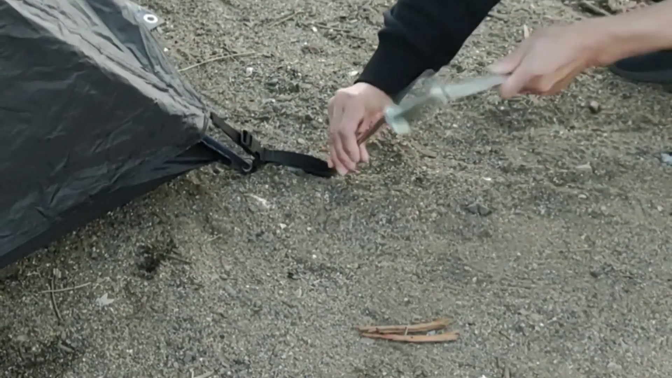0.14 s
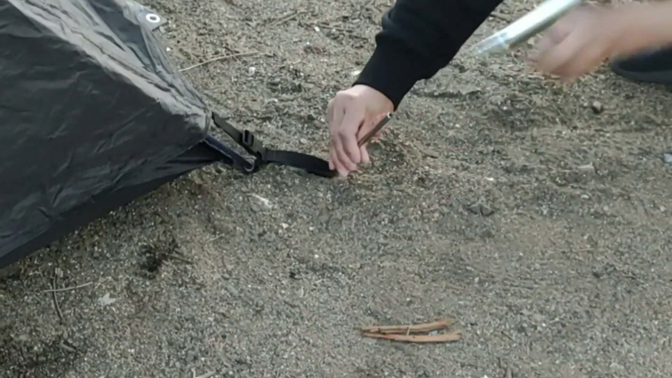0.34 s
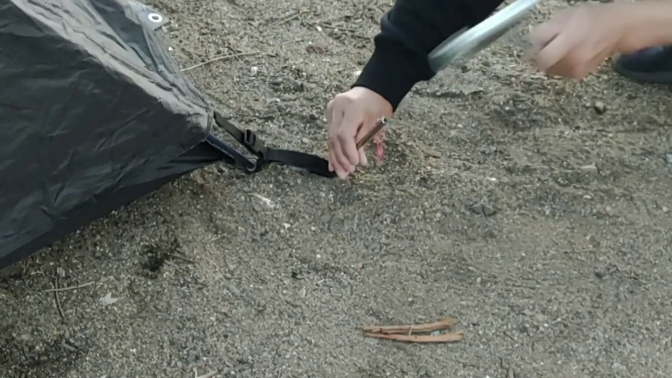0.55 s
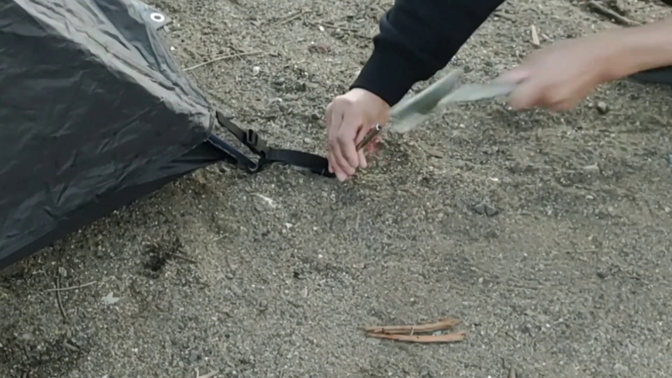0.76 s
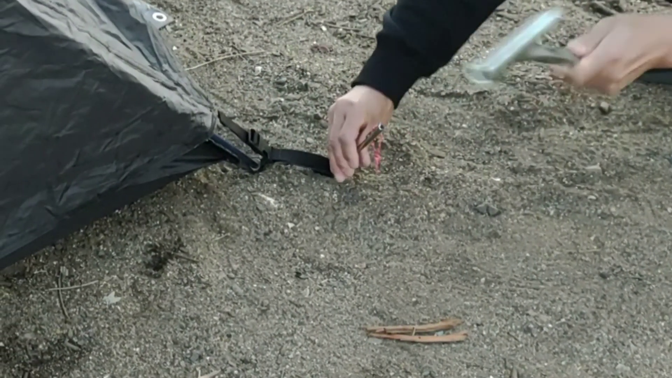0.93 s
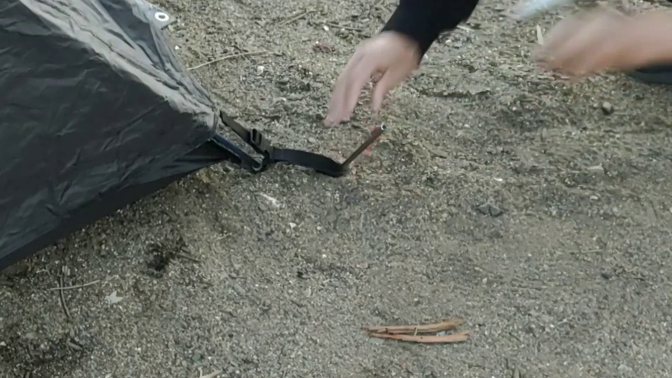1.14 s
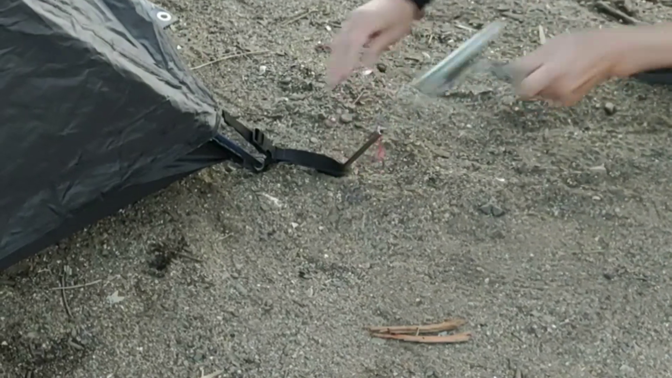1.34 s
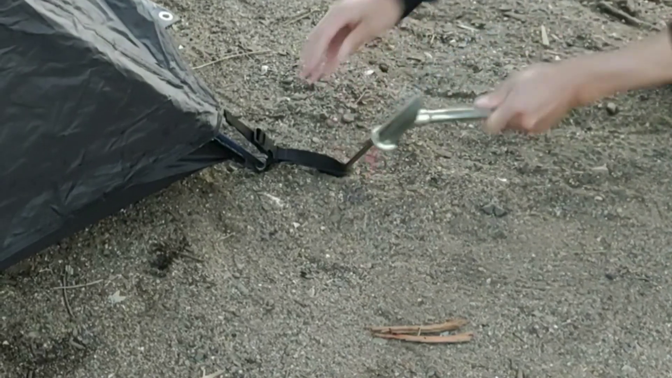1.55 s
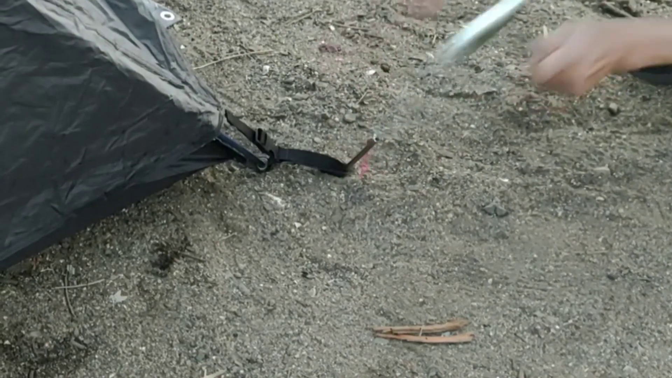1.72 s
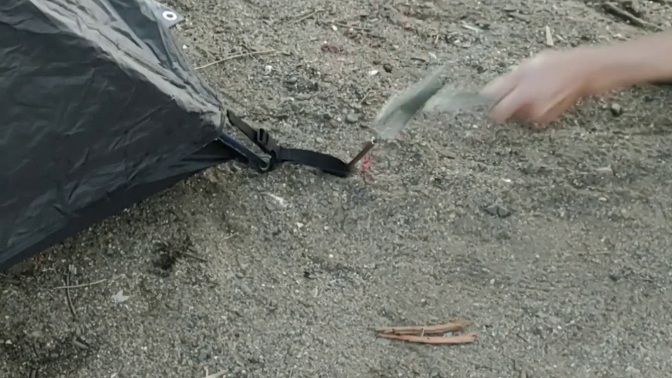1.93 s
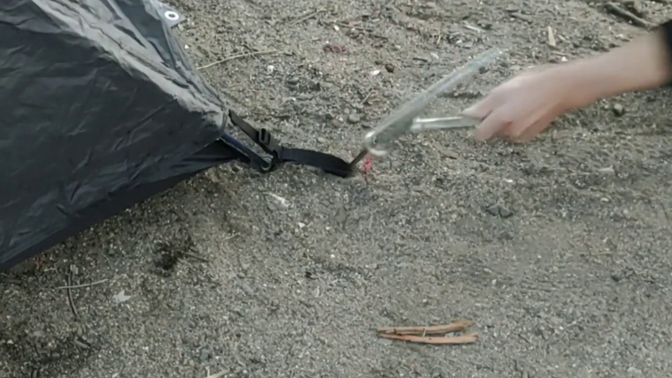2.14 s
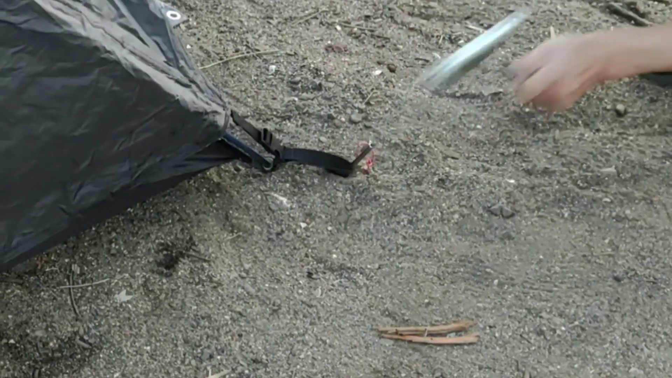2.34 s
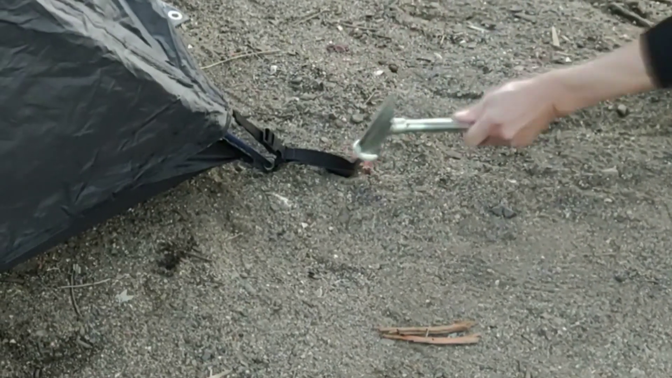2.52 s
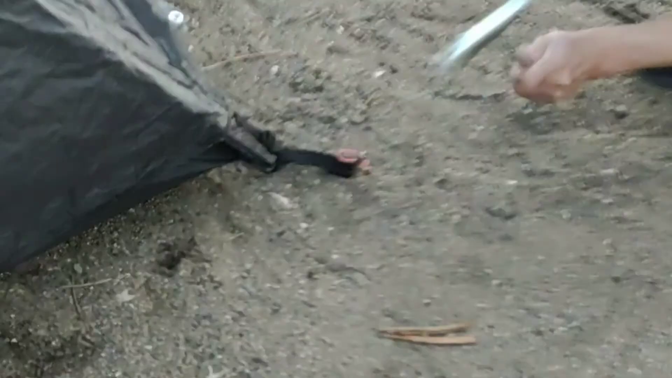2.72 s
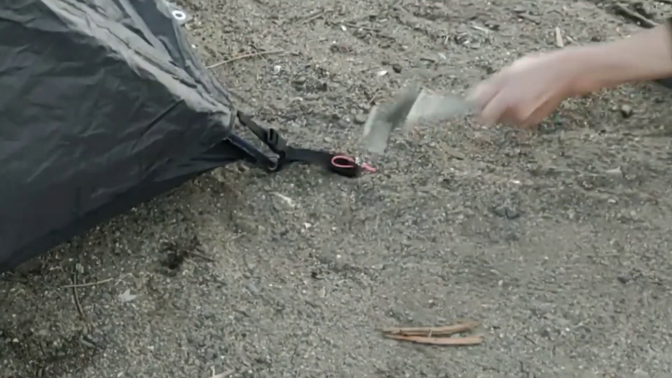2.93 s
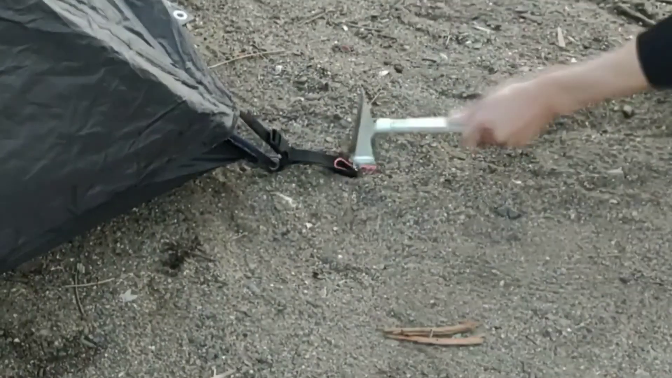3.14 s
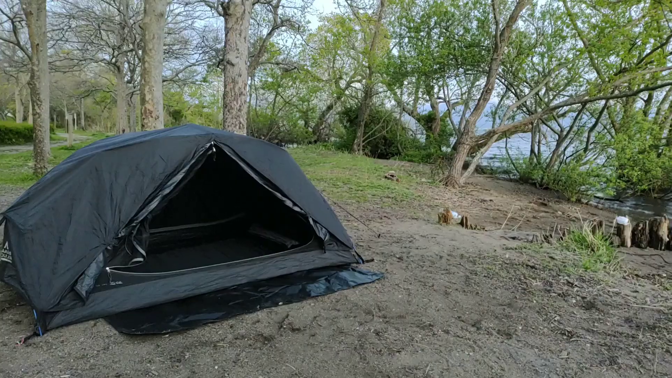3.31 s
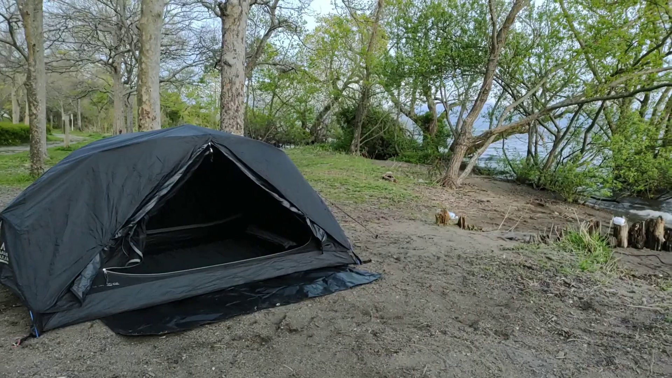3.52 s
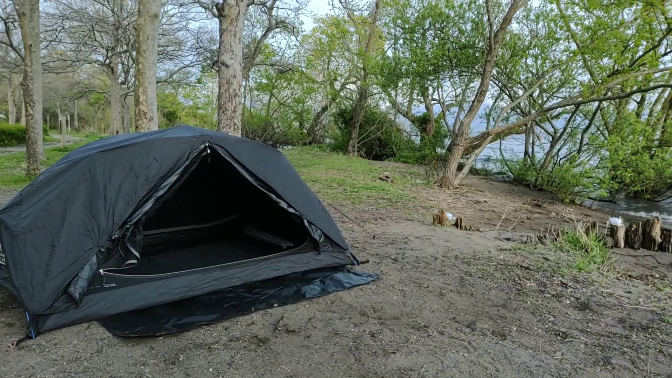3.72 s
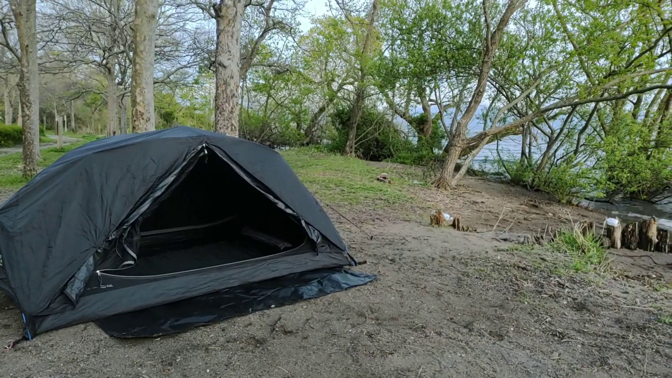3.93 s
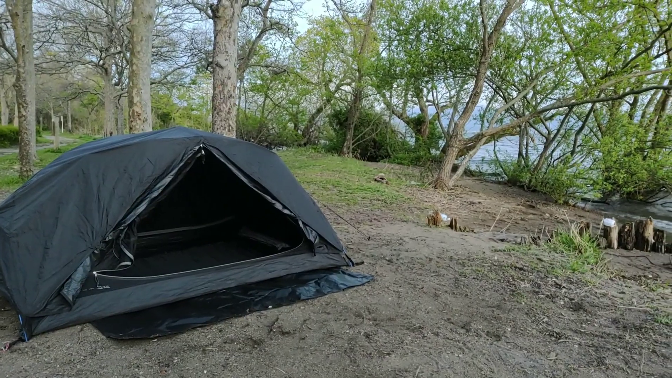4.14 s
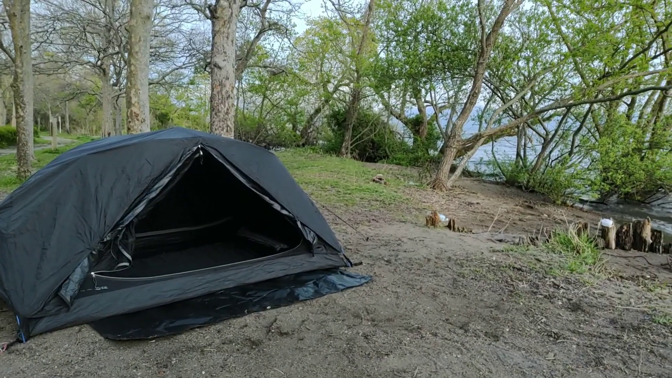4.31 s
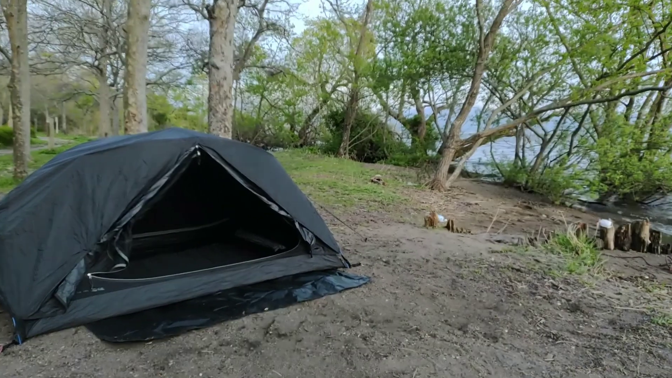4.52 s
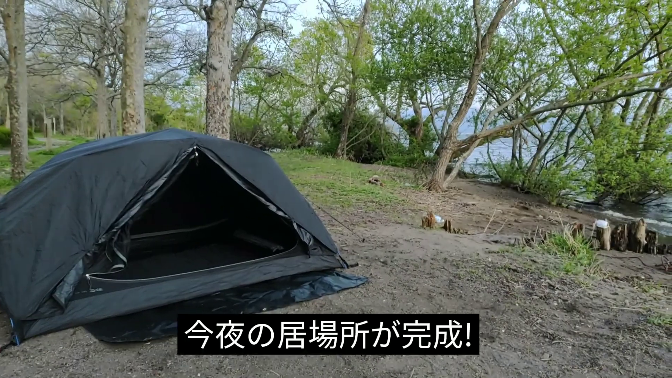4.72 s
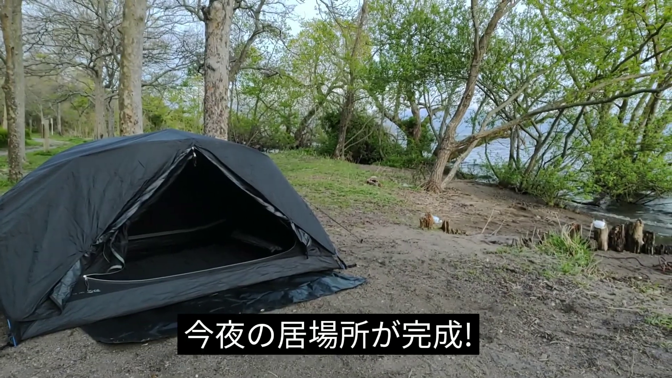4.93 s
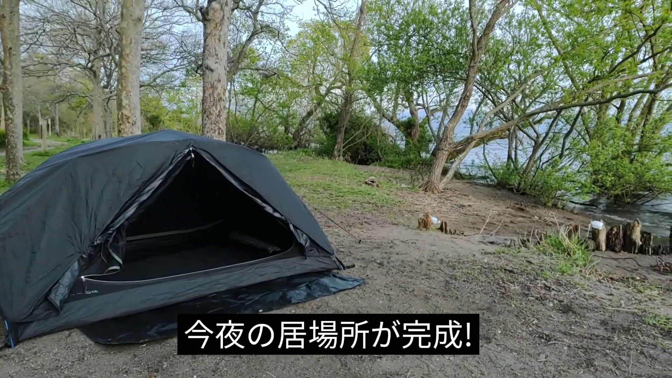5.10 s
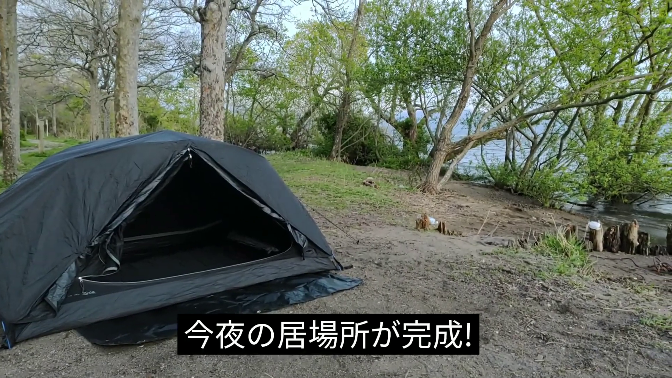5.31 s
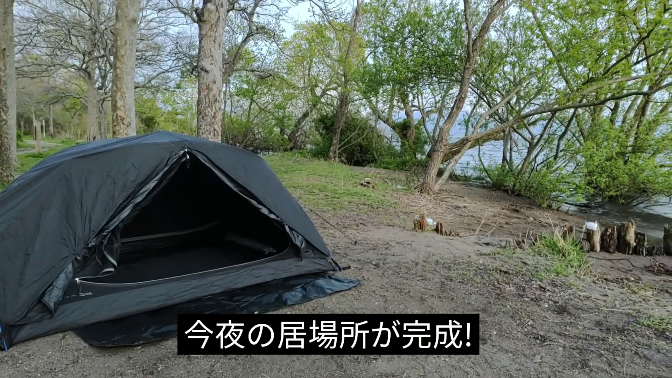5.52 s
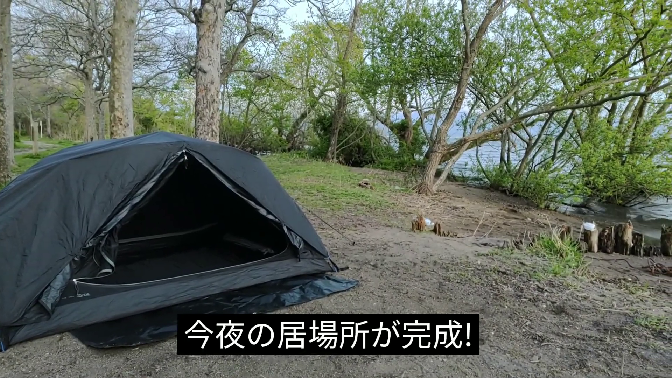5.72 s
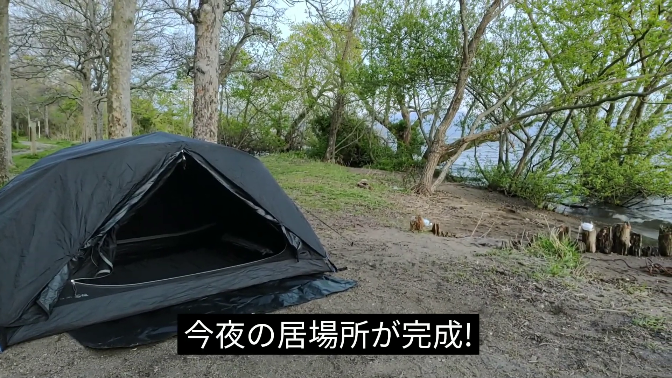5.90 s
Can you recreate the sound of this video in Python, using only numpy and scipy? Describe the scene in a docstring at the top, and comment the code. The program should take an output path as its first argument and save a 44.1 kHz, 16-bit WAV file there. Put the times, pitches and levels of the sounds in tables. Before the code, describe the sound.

The scene opens on the fading end of a hammer blow. Close by, a steel hammer then strikes a metal tent peg at about 0.27, 0.53, 0.8, 1.35, 1.65, 2.0, 2.3, 2.6 and 2.95 seconds. Each clink is hard, very bright and short, with a high ringing note, gritty crunch, dry knock and small thud into soil, then thin shimmer and faint dense echoes from trees. A soft breeze with low rumble and a faint wavering drone sits below, ducking at blows; small scuffs, low microphone thumps and a faint water lap or two near 2 seconds. At 3.2 everything cuts to a very short silence. From 3.4 a lake shore fades in: small waves wash, splash and hiss, swelling around 4.3, easing near 5, rising again at 5.6 to 6, with bubbling gulps, spray patter, crisp ticks mostly left, and deep rumble.

```python
"""Tent peg among trees, then a lake shore

Close by, a steel hammer drives a peg into gritty ground: one blow already dying away, then nine clinks
of ringing modes and noise bursts, scattered back as dense faint echoes. A limiter ducks the breeze at
loud blows. After a short silence a stirred lake shore fades in: shaped noise, ringing grains, ticks.
Water laps in both places, and each microphone port adds its own treble resonance."""
import sys
import numpy as np
from scipy import signal
from scipy.fft import rfft, irfft, next_fast_len
from scipy.io import wavfile
from scipy.ndimage import uniform_filter1d, minimum_filter1d

SR = 44100
rng = np.random.default_rng(int(sys.argv[2]) if len(sys.argv) > 2 else 0)


def pcm_store(signal):
    """Save signal as 16-bit PCM."""
    levels = np.round(np.clip(np.atleast_2d(signal), -1, 1) * 32767)
    wavfile.write(sys.argv[1], SR, levels.astype(np.int16).T)


N = 267201
TIME = np.arange(N) / SR
TENT_END_S, SHORE_START_S, SHORE_FADE_IN_S = 3.228, 3.362, 0.13
CUTOFF_HZ = 15500

# Hammer blows. Each row: start in seconds, strength in dB, the peg's note in Hz, then in dB the levels of
# note, lingering part, low clank, high clank, top ping, and knock with thud; last the jolt to the left
# and right microphone (linear).
BLOWS = [(-0.016, -18, 6880, 13, 1.5, -2, 6, -4, -4, 0.0077, 0.022),
         (0.2692, -5, 6820, 1, -8.5, 4, 14, -15, 2.5, 0.33, 0.091),
         (0.5349, -4, 6780, -3.5, -8, 7, -4, -17, 1, 0.33, 0.18),
         (0.791, -6, 6860, 2.5, 4.5, 2, -14, 3.5, 3, 0.037, 0.12),
         (1.3482, -5.5, 7040, 5, -7, 9, 0, -8, 1.5, 0.07, 0.13),
         (1.653, -5.5, 6904, 9.5, 6, 3, 0, -4, 1, 0.033, 0.48),
         (1.978, -3.5, 6900, -5.5, -6, 3, 0.5, -10, 1, 0.017, 0.0023),
         (2.2892, -5.5, 6800, 2, -1.5, 9.5, 5, -0.5, 3, 0.52, 0.1),
         (2.6268, -3.5, 6760, 1, 0, 10.5, 3.5, 8.5, 6, 0.37, 0.89),
         (2.948, -6, 6820, 1.5, 2.5, -8, 2.5, -19, 1.5, 0.072, 0.11)]
# Peg damped by soil and hand. Each row: nominal mode in Hz, level in dB, 60 dB decay in seconds.
PEG_MODES = [(4650, -30.5, 0.014), (4920, -44, 0.012), (7180, -7, 0.012), (6750, -21, 0.014),
             (7420, -12, 0.037), (7890, -8.5, 0.013), (8800, -16.5, 0.042), (9000, -12.5, 0.013),
             (9600, -48, 0.055), (9800, -24, 0.037), (11460, -28, 0.014), (12400, -39.5, .022),
             (13200, -19, 0.033), (13800, -22.5, 0.039)]
# Centres of low clank, high clank and top ping. Each row: nominal Hz, level in dB, 60 dB decay in seconds.
CLANK = [(4415, -18.5, 0.018), (5650, -16, 0.022), (11240, -14, 0.018)]
CLANK_SPLIT_HZ = 132   # nominal spacing of the three modes in a clank
# Grit crunching around the peg. Each row: frequency in Hz, density in dB per Hz.
CRUNCH_COLOUR = [(1500, -15), (3000, 2.5), (4300, 3.5), (5600, 4), (6200, -8), (7000, -2), (9000, -12.5),
                 (11000, 8.5), (12500, 3), (15000, 10)]
# Close modes that beat as the peg's note. Each row: offset from the note in Hz, level in dB.
NOTE_MODES = [(-6.5, -7.5), (35.5, -30), (-74, -20)]
NOTE_T60_S = 0.058   # how fast the soil soaks up the peg's note
# Lingering partials of the note. Each row: offset from the note in Hz, spread in Hz, level in dB.
LINGER = [(0.5, 13, -24.5), (-60.5, 59, -30)]
# Fine partials of hammer head and peg. Each row: centre in Hz, spread in Hz, level in dB.
SHIMMER = [(5600, 54, -44.5), (7350, 70, -43.5), (7900, 95, -36.5), (11200, 110, -34.5), (12150, 80, -42.5),
           (13660, 170, -41.5), (14650, 250, -38), (15250, 130, -40)]
# Scatter from ground, tent and trees. Each row: delay in seconds, 60 dB decay in seconds, level in dB.
SCATTER = [(.002, 0.032, -7.5), (0.011, 0.416, -14.5)]
# Colour of the scattered sound. Each row: frequency in Hz, level in dB.
SCATTER_COLOUR = [(1500, -35.5), (3600, 0), (4400, -0.5), (5800, -2), (6300, -20.5), (6800, 6.5),
                  (7300, -1), (10000, -0.5), (10600, -14.5), (11200, -5), (12700, -5.5), (15500, -6.5)]
# Soft scuffs on the grit beside the tent. Each row: start in seconds, relative level in dB, length in seconds.
SCUFFS = [(0.078, -39, 0.0096), (2.44, -57, 0.035), (3.078, -37, 0.058)]

# Small waves breaking on the shore. Each row: crest in seconds, height in dB above the calm water.
WAVES = [(3.52, -1.5), (3.8, 5), (4.3, 8.5), (4.55, 5.5), (5.2, 3), (5.45, 3), (5.63, 6.5), (5.82, 9),
         (6.02, 5.5)]
WAVE_RISE_S, WAVE_FALL_S = 0.089, 0.14   # time constants of build-up and run-out
# The water's three voices. Each row: frequency in Hz, density in dB per Hz.
WASH_COLOUR = [(20, 1), (60, -1.5), (150, -2.5), (400, -1), (750, -1), (1100, -4), (2000, -18), (5000, -46)]
SPLASH_COLOUR = [(500, -36), (1200, 2), (2000, -0.5), (2800, 0), (3500, -3), (4500, -2.5), (6000, -9),
                 (9000, -9.5), (15000, -18.5)]
HISS_COLOUR = [(500, -18), (3000, 1.5), (5500, 4), (8000, 4), (10000, 3), (11500, -4), (15500, -2)]
# level when calm (dB), and dB gained per dB of swell
WASH_DB, WASH_FOLLOWS = -49.5, 0.44
SPLASH_DB, SPLASH_FOLLOWS = -52.5, 0.92
HISS_DB, HISS_FOLLOWS = -56.5, 0.88
# Left-right likeness at the shore. Each row: frequency in Hz, likeness from -1 (opposed) to 1 (same).
SHORE_LIKENESS = [(30, 0.79), (120, 1), (300, 1), (700, 0.58), (1500, 0.65), (3000, 0.3), (8000, 0.093)]
SHORE_LAG_S = 0.000414   # the water's sound reaches the left microphone first
# Water lapping at the bank. Each row: start in seconds, nominal pitch in Hz, relative level in dB.
LAPS = [(1.874, 278, -32), (2.068, 740, -38), (3.502, 790, -33), (4.056, 690, -36), (4.36, 266, -35),
        (4.708, 433, -37), (5.28, 380, -34), (5.282, 495, -34), (5.6, 245, -29), (5.718, 470, -28),
        (5.793, 320, -29), (5.803, 405, -28), (5.865, 340, -32), (5.93, 420, -34)]
# Light ticks of twigs and grit. Each row: start in seconds, relative level in dB.
TICKS = [(3.6538, -27.5), (3.784, -21), (4.2235, -27), (4.2675, -17.5), (4.285, -25), (4.379, -22),
         (4.5298, -27), (5.145, -25), (5.1692, -16.5), (5.4397, -28), (5.4631, -27), (5.6906, -27),
         (5.752, -25), (5.829, -23)]

# Low rumble under the shore. Each row: time in seconds, level in dB.
LOW_RUMBLE = [(3.36, -63), (3.5, -63.5), (3.55, -48), (3.8, -44), (4.2, -43.5), (4.45, -45.5), (4.7, -51.5),
              (5.1, -52.5), (5.3, -52.5), (6.05, -55)]
# Its colour. Each row: frequency in Hz, density in dB per Hz.
LOW_RUMBLE_COLOUR = [(8, 11.5), (20, 0), (35, -5.5), (70, -2.5), (130, -10.5), (400, -23.5), (2000, -76)]
# Level of the breeze at the tent, at first still ducked by the limiter after the earlier blow.
# Each row: time in seconds, level in dB.
BREEZE = [(0, -6.5), (.065, -9.5), (.085, 0.5), (.6, -.5), (1.2, 1.5), (2.15, 2.5), (2.5, 3), (2.85, 1),
          (3.22, 1.5)]
# Soft air and low rumble of the breeze. Each row: frequency in Hz, density in dB per Hz.
AIR_COLOUR = [(60, -11.5), (200, -1), (500, -1.5), (1000, -1), (1500, -3.5), (2500, -4.5), (4000, -11),
              (6000, -9.5), (8000, -11.5), (10000, -13.5), (12000, -21), (15500, -26.5)]
RUMBLE_COLOUR = [(10, 4), (25, 1.5), (60, -1.5), (92, -2), (120, -7), (190, -15.5), (300, -20.5),
                 (700, -25), (3000, -85)]
AIR_DB, RUMBLE_DB, RUMBLE_FOLLOWS = -50, -41.5, 2.05   # levels at 0 dB of breeze; dB of rumble per dB of breeze
# Left-right likeness at the tent. Each row: frequency in Hz, likeness from -1 (opposed) to 1 (same).
TENT_LIKENESS = [(30, -0.019), (120, 0.2), (300, 0.81), (700, 0.21), (1300, -0.54), (2500, 0.013),
                 (15000, -0.17)]
# Low thumps in the microphones, some as the limiter lets go.
# Each row: start in seconds, relative left and right level in dB.
THUMPS = [(.078, 2.5, -24), (2.713, -5, 2.5), (2.92, -9.5, 0), (3.208, -13, -3)]
# A faint low drone. Each row: time in seconds, level in dB.
DRONE = [(0, -57), (.8, -49.5), (1.2, -45), (1.9, -44.5), (2.5, -41), (3.2, -61)]
# Microphone ports, left then right. Each row: resonance in Hz, half its Q, lift in dB.
PORTS = [(7920, 5.43, 15.5), (9540, 6, 16)]


def from_db(db):
    """Decibels to gain."""
    return 10 ** (np.asarray(db) / 20)


def in_time(rows):
    """Each column of a curve, at every sample."""
    s, *columns = np.transpose(rows)
    return [np.interp(TIME, s, column) for column in columns]


def at_hz(points, hz):
    """Read a spectrum on a log-frequency axis."""
    f, value = np.transpose(points)
    return np.interp(np.log(hz + 1), np.log(f), value)


def dying(t, t60):
    """Exponential decay, 60 dB down after t60 seconds."""
    return np.exp(-np.log(1000) * t / t60)


def add(out, s, sound):
    """Mix a sound in from time s; what falls outside the scene is cut off."""
    i = round(s * SR)
    out[:, max(0, i):i + sound.shape[-1]] += sound[..., max(0, -i):N - i]


def band(x, low_hz, high_hz):
    """Causal band-pass."""
    edges = [low_hz, min(high_hz, .45 * SR)]
    return signal.sosfilt(signal.butter(2, edges, "band", fs=SR, output="sos"), x)


def drift(rate):
    """Random wander around zero, through `rate` normally distributed points a second."""
    knots = rng.standard_normal(2000)
    return np.interp(TIME * rate, np.arange(len(knots)), knots)


def noise(spectrum, flutter_db, rate, likeness=TENT_LIKENESS, lag_s=0):
    """Stereo noise of a given colour, fluttering in level and late on the right by lag_s; rms 1."""
    size = next_fast_len(N, real=True)
    hz = np.arange(size // 2 + 1) * SR / size
    alike = np.clip(at_hz(likeness, hz), -1, 1)
    mid, side = rfft(rng.standard_normal((2, size)))
    pair = np.sqrt(1 + alike) * mid + np.sqrt(1 - alike) * side * [[1], [-1]]
    pair[1] *= np.exp(-2j * np.pi * hz * lag_s)
    coloured = irfft(pair * from_db(at_hz(spectrum, hz)), size)[:, :N]
    x = coloured * from_db(flutter_db * drift(rate))
    return x / x.std()


def ring(t, modes, spread_db):
    """Struck modes; each reaches either port with its own strength and phase."""
    hz, db, t60 = np.transpose(modes)[:, :, None, None]
    gain = from_db(db + spread_db * rng.standard_normal((len(modes), 2, 1)))
    phase = 2 * np.pi * rng.random((len(modes), 2, 1))
    build_up = 1 - dying(t, .001)
    return np.sum(gain * np.sin(2 * np.pi * hz * t + phase) * dying(t, t60), axis=0) * build_up


def partials(t, groups, t60, count=12):
    """Groups of close partials that beat irregularly as they die."""
    modes = [(hz + width * off, db - 10 * np.log10(count), t60)
             for hz, width, db in groups for off in rng.standard_normal(count)]
    return ring(t, modes, 0)


def grains(per_s, low_hz, high_hz, cycles, spread_db, count=16):
    """Random small pops ring at `count` pitches, each pop at its own place; 60 dB down in `cycles`; rms 1."""
    out = np.zeros((2, N))
    for hz in np.geomspace(low_hz, high_hz, count):
        when, size, place = rng.random((4000, 3))[:int(per_s * N / SR / count)].T
        pops = np.zeros((2, N))
        level = from_db(-spread_db * np.log(0.018 + size))   # a few pops are much louder
        pops[:, (when * N).astype(int)] = level * np.sqrt([place, 1 - place])
        # two-pole resonator
        r, w = dying(1 / SR, cycles / hz), 2 * np.pi * hz / SR
        feed = [0, np.sin(w), -np.sin(w)] / (2 * np.sin(w / 2))
        out += signal.lfilter(feed, [1, -2 * r * np.cos(w), r * r], pops + 1e-18)
    return out / out.std()


def hammer(crack_db=4.0, crack_t60=0.0028, crunch_db=-8.0, crunch_t60=0.022, knock_db=-7.0,
           knock_t60=0.026, thud_db=-3.0, thud_t60=0.024, detune=0.0044):
    """Steel cracks on steel, peg and head ring, grit crunches, a dry knock and a thud go into the soil."""
    out, t = np.zeros((2, N)), TIME[:SR // 4]
    grit_colour = from_db(at_hz(CRUNCH_COLOUR, np.fft.rfftfreq(len(t), 1 / SR)))
    for s, db, _, _, _, *clank_db, dull_db, _, _ in BLOWS:
        struck = PEG_MODES + [(hz + k * CLANK_SPLIT_HZ, level + extra_db, t60)
                              for (hz, level, t60), extra_db in zip(CLANK, clank_db) for k in (-1, 0, 1)]
        # the soil grips the peg differently at every blow, which shifts its modes
        gripped = [(hz * (1 + detune * rng.standard_normal()), level, t60) for hz, level, t60 in struck]
        body = ring(t, gripped, spread_db=-1.5)
        burst = rng.standard_normal((4, 2, len(t)))
        crack = from_db(crack_db) * band(burst[0] * dying(t, crack_t60), 2360, 13000)
        grit = irfft(rfft(burst[3]) * grit_colour, len(t))
        crunch = from_db(crunch_db) * grit * dying(t, crunch_t60)
        knock = from_db(knock_db + dull_db) * band(burst[1] * dying(t, knock_t60), 480, 2500)
        # the thud is the same in both microphones
        thud = from_db(thud_db + dull_db) * band(burst[2, 0] * dying(t, thud_t60), 48, 510)
        add(out, s, from_db(db) * (body + crack + crunch + knock + thud))
    return out


def peg_note(linger_t60=0.4, right_db=0.5):
    """The peg's note: close modes soon soaked up by the soil, and a lingering part set for each blow."""
    out, t = np.zeros((2, N)), TIME[:SR // 2]
    for s, db, hz, note_db, linger_db, *_ in BLOWS:
        quick_modes = [(hz + offset, level + note_db, NOTE_T60_S) for offset, level in NOTE_MODES]
        quick = ring(t, quick_modes, 0)
        slow_groups = [(hz + offset, width, level + linger_db) for offset, width, level in LINGER]
        slow = partials(t, slow_groups, linger_t60, count=6)
        add(out, s, from_db(db) * (quick + slow * (1 - dying(t, NOTE_T60_S))))
    return out * from_db([[0], [right_db]])


def shimmer(t60=0.24):
    """Fine high partials of the steel outlast each clink."""
    out, t = np.zeros((2, N)), TIME[:SR // 3]
    for s, db, *_ in BLOWS:
        add(out, s, from_db(db) * partials(t, SHIMMER, t60, count=4))
    return out


def trees(x):
    """Dense faint echoes: a quick cluster from nearby and a longer tail from the trunks."""
    echoes, t = np.zeros((2, N)), TIME[:SR]
    colour = from_db(at_hz(SCATTER_COLOUR, np.arange(SR // 2 + 1)))
    for delay, t60, db in SCATTER:
        tail = irfft(rfft(rng.standard_normal((2, SR))) * colour) * dying(t, t60)
        add(echoes, delay, from_db(db) * tail / np.linalg.norm(dying(t, t60)))
    return signal.fftconvolve(x, echoes[:, :SR], axes=1)[:, :N]


def microphone_sway(swing_hz=2.14, t60=0.78, start_rad=0.87):
    """Each blow knocks the microphones off their rest level; they swing back below hearing."""
    out, t = np.zeros((2, N)), TIME[:SR]
    swing = -np.cos(2 * np.pi * swing_hz * t + start_rad) * dying(t, t60) * (1 - dying(t, 0.017))
    for s, *_, left, right in BLOWS:
        add(out, s, np.outer([left, right], swing))
    return out


def scuffs(scuff_db=-14.0, low_hz=1800, high_hz=5500):
    """Grit shifts under a hand or knee: a brief rasp that swells and dies."""
    out, t = np.zeros((2, N)), TIME[:SR // 2]
    for s, db, length_s in SCUFFS:
        rasp = band(rng.standard_normal((2, len(t))), low_hz, high_hz)
        shape = 2 * t / length_s * np.exp(-2 * t / length_s) * np.e   # peaks at half the length
        add(out, s, from_db(db + scuff_db) * rasp / rasp.std() * shape)
    return out


def swell():
    """How far the water is stirred above calm, in dB: every wave builds up to its crest and runs out."""
    power = np.ones(N)
    for crest_s, height_db in WAVES:
        t = TIME - crest_s
        power += from_db(height_db) ** 2 * np.exp(np.minimum(t / WAVE_RISE_S, -t / WAVE_FALL_S))
    return 10 * np.log10(power)


def shore(swell_db, hiss_pan_db=5.0):
    """Small waves wash, splash and hiss; the higher the swell, the brighter. The hiss leans left."""
    place = dict(likeness=SHORE_LIKENESS, lag_s=SHORE_LAG_S)
    wash_level = from_db(WASH_DB + WASH_FOLLOWS * swell_db)
    wash = wash_level * noise(WASH_COLOUR, flutter_db=0.0, rate=16, **place)
    splash_level = from_db(SPLASH_DB + SPLASH_FOLLOWS * swell_db)
    splash = splash_level * noise(SPLASH_COLOUR, flutter_db=2.0, rate=66, **place)
    hiss_level = from_db(HISS_DB + HISS_FOLLOWS * swell_db)
    hiss = hiss_level * noise(HISS_COLOUR, flutter_db=1.34, rate=68, **place)
    return wash + splash + hiss * from_db([[hiss_pan_db], [-hiss_pan_db]])


def ripples(swell_db, bubble_db=-57.0, droplet_db=-65.5, fizz_db=-65.0):
    """Ringing bubbles, droplets and fine spray grow and fade with the waves."""
    bubbles = grains(per_s=90, low_hz=184.3, high_hz=1215, cycles=65, spread_db=3.0, count=24)
    fizz = grains(per_s=260, low_hz=5100, high_hz=11000, cycles=130, spread_db=2.5, count=40)
    droplets = grains(per_s=110, low_hz=1506, high_hz=4800, cycles=80, spread_db=3.0, count=30)
    return (from_db(bubble_db + WASH_FOLLOWS * swell_db) * bubbles
            + from_db(droplet_db + SPLASH_FOLLOWS * swell_db) * droplets
            + from_db(fizz_db + HISS_FOLLOWS * swell_db) * fizz)


def rustle(swell_db, rustle_db=-65.5):
    """Spray patters in short crisp flurries, a little to the left."""
    patter = grains(per_s=200, low_hz=7000, high_hz=11000, cycles=16, spread_db=4.5, count=10)
    flurries = from_db(3.5 * drift(24))
    return from_db(rustle_db + HISS_FOLLOWS * swell_db) * flurries * patter * from_db([[2], [-3]])


def laps(lap_t60=0.045, rise=0.49, spread=0.14, cluster_s=0.01764, lap_db=-7.0, count=3):
    """Water slaps the bank and traps a few pockets of air, each gulping with rising pitch."""
    out, t = np.zeros((2, N)), TIME[:SR // 4]
    shape = dying(t, lap_t60) * (1 - dying(t, 0.0049))
    for s, hz, db in LAPS:
        for size, late, place in rng.uniform(-0.89, 1, (count, 3)):
            pocket_hz = hz * (1 + spread * size)
            phase = 2 * np.pi * pocket_hz * t * (1 + rise * t)
            gulp = np.sin(phase + [[place], [0]])   # left phase offset places the gulp
            add(out, s + cluster_s * abs(late), from_db(db + lap_db) * gulp * shape)
    return out


def ticks(tick_db=-4.0, tick_t60=0.013, low_hz=6500, high_hz=10000):
    """Dry bits of twig and grit tick as short noise bursts, mostly on the left."""
    out, t = np.zeros((2, N)), TIME[:SR // 4]
    for s, db in TICKS:
        tick = band(rng.standard_normal((2, len(t))) * dying(t, tick_t60), low_hz, high_hz)
        add(out, s, from_db(db + tick_db) * tick * from_db([[0], [-6]]))
    return out


def low_rumble():
    """Low rumble under the shore, rising and then easing: noise weighted to the deepest bass."""
    level_db, = in_time(LOW_RUMBLE)
    return from_db(level_db) * noise(LOW_RUMBLE_COLOUR, flutter_db=2.0, rate=41, likeness=SHORE_LIKENESS)


def breeze():
    """Soft air over a low rumble: two shaped noises that follow the strength of the breeze."""
    breeze_db, = in_time(BREEZE)
    air = from_db(AIR_DB + breeze_db) * noise(AIR_COLOUR, flutter_db=1.0, rate=49)
    rumble_level = from_db(RUMBLE_DB + RUMBLE_FOLLOWS * breeze_db)
    return air + rumble_level * noise(RUMBLE_COLOUR, flutter_db=-0.2, rate=26)


def thumps(tone_hz=95, tone_db=-16.5, tone_t60=0.024, burst_db=-14.5, burst_t60=0.0386):
    """Low thumps in the microphones: a dying bass tone with a short low noise burst."""
    out, t = np.zeros((2, N)), TIME[:SR // 4]
    for s, left_db, right_db in THUMPS:
        tone = -from_db(tone_db) * np.sin(2 * np.pi * tone_hz * t) * dying(t, tone_t60)
        burst = from_db(burst_db) * band(rng.standard_normal(len(t)) * dying(t, burst_t60), 165, 295)
        add(out, s, (tone + burst) * from_db([[left_db], [right_db]]))
    return out


def drone(hz=91, waver_hz=3.06):
    """A faint low tone under the breeze, wavering in pitch and level."""
    level_db, = in_time(DRONE)
    level = from_db(level_db + 2 * drift(27.26))
    return level * np.sin(2 * np.pi * np.cumsum(hz + waver_hz * drift(20)) / SR)


def scene(note_scatter_db=-14.0, fade_from_db=-7.5):
    """The hammering, a moment of silence, then the shore fades in; laps run through both places."""
    blows, note, swell_db = hammer(), peg_note(), swell()
    hammering = blows + note + shimmer() + trees(blows + from_db(note_scatter_db) * note)
    tent = hammering + microphone_sway() + scuffs() + breeze() + thumps() + drone()
    lake = shore(swell_db) + ripples(swell_db) + rustle(swell_db) + ticks() + low_rumble()
    fade_in = np.interp(TIME - SHORE_START_S, [0, SHORE_FADE_IN_S], [from_db(fade_from_db), 1], left=0)
    return tent * (TIME < TENT_END_S) + lake * fade_in + laps()


def port(x, hz, half_q, db):
    """The small cavity before a microphone lifts one treble band."""
    return x + (from_db(db) - 1) * signal.lfilter(*signal.iirpeak(hz, 2 * half_q, fs=SR), x)


def limiter(x, threshold_db=-10.5, hold_s=0.073, release_db_per_s=750, ahead_s=0.007):
    """Looks ahead, drops the gain for a loud peak, holds it, then lets go quickly."""
    power = uniform_filter1d(np.mean(x ** 2, axis=0), size=64)
    cut_db = np.minimum(0, threshold_db - 10 * np.log10(np.abs(power) + 1e-12))
    hold, ahead = int(hold_s * SR), int(ahead_s * SR)
    held_db = minimum_filter1d(cut_db, hold, origin=(hold - 1) // 2, mode="nearest")
    # the gain may climb back no faster than the release
    ramp_db = release_db_per_s * TIME
    released_db = np.minimum.accumulate(held_db - ramp_db) + ramp_db
    return x * from_db(uniform_filter1d(minimum_filter1d(released_db, 2 * ahead), ahead))


def record(dry):
    """Port resonances, limiter, rounded peaks and a steep top cut."""
    top = 0.8   # level that the rounded peaks approach
    x = limiter(np.array([port(side, *row) for side, row in zip(dry, PORTS)]))
    rounded = top * np.tanh(x / top)
    return signal.sosfilt(signal.ellip(10, .1, 80, CUTOFF_HZ, fs=SR, output="sos"), rounded)


dry = scene()
out = record(dry)
pcm_store(out)
```